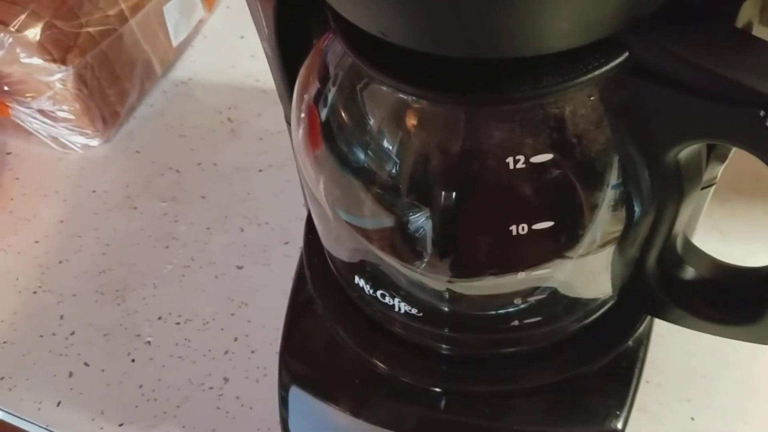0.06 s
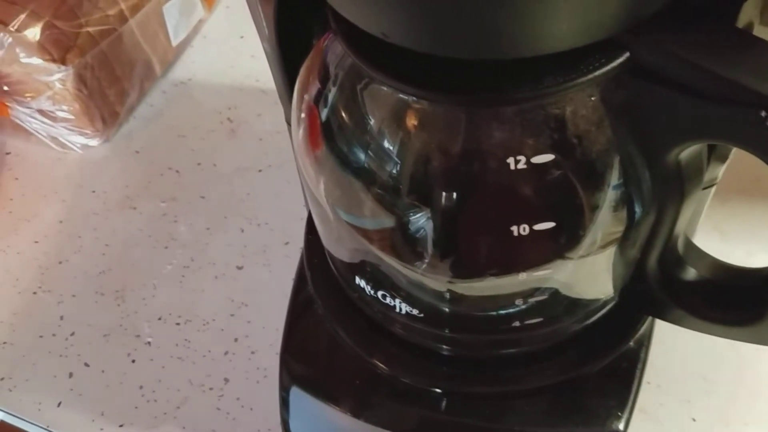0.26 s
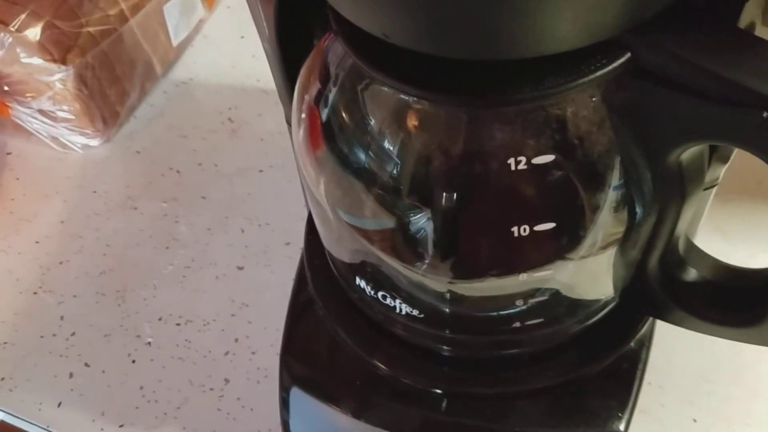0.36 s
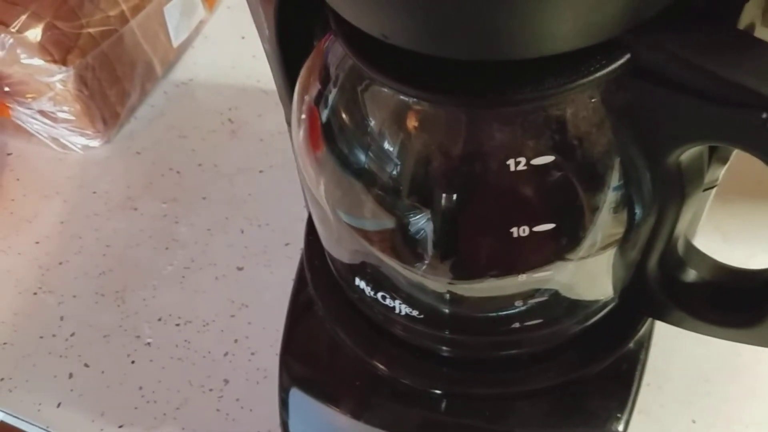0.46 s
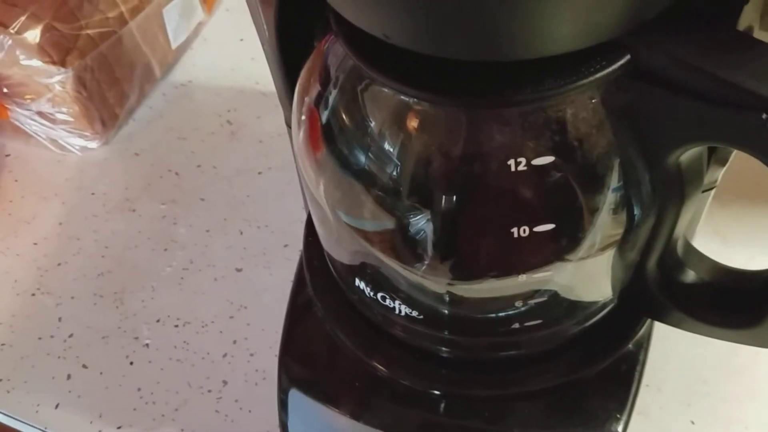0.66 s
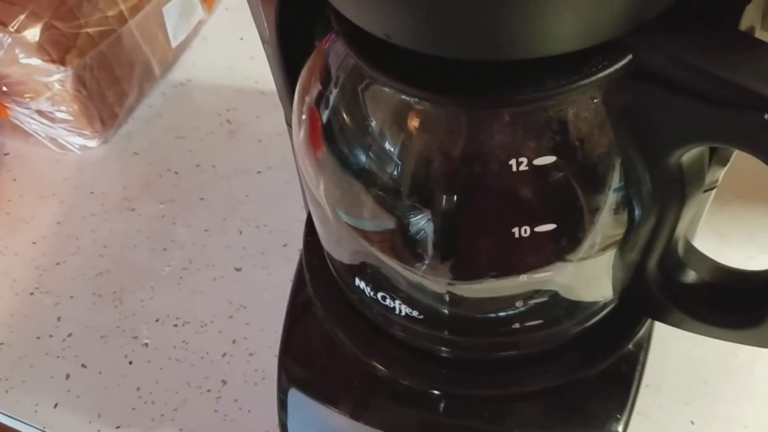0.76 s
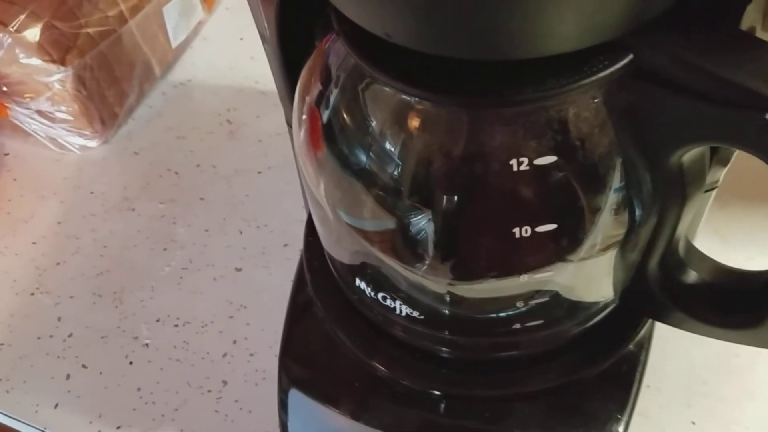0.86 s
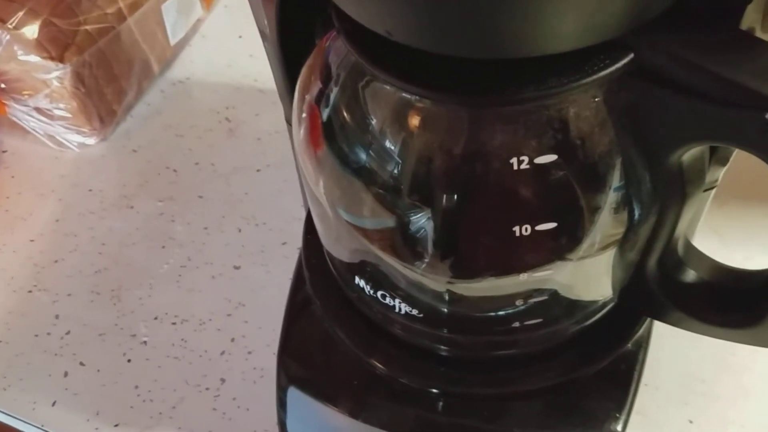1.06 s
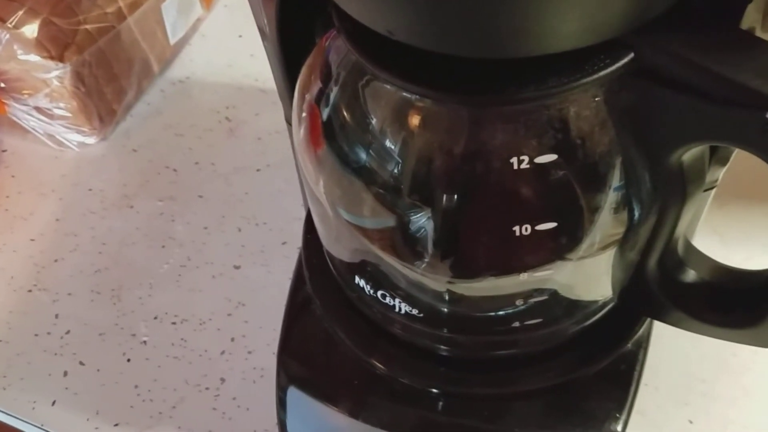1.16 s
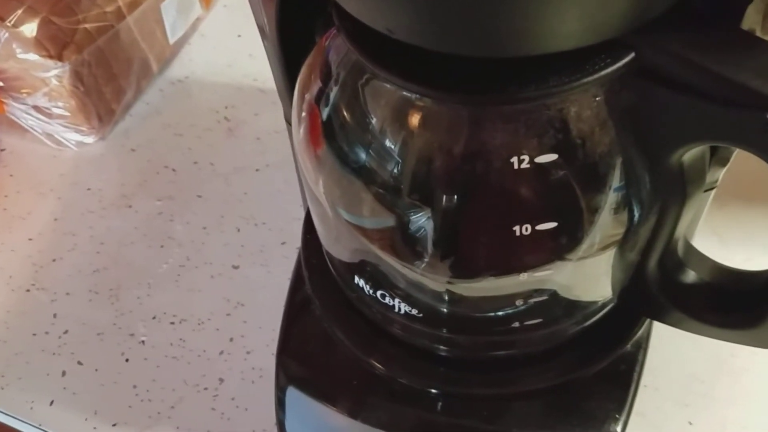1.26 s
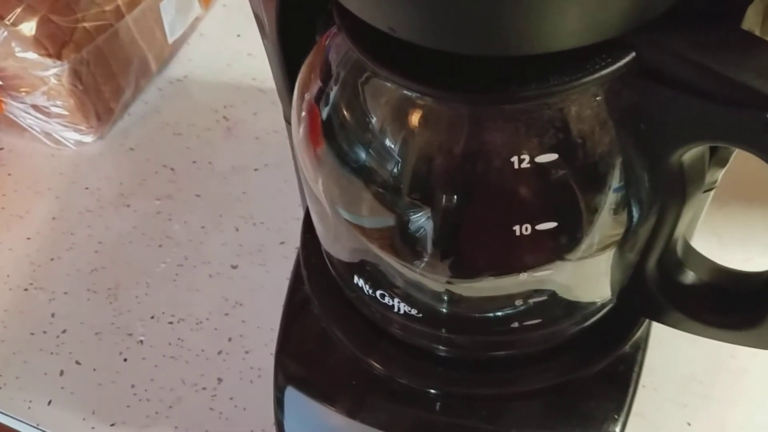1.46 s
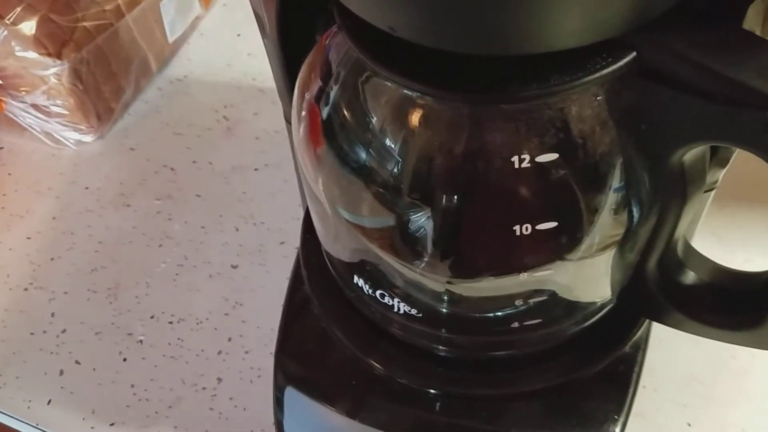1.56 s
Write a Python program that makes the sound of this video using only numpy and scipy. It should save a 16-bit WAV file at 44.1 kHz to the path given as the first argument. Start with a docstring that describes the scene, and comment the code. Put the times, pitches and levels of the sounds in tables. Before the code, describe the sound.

A drip coffee maker gurgles close by on a kitchen counter, with irregular wet bubbling and low gulps. One bubble pops sharply near the middle, then small spits of steam tick over a faint room rumble.

```python
"""On a kitchen counter, a drip coffee maker gurgles. Steam bubbles burst inside it, and each one
makes the plastic housing ring and throws a short wet splash. Larger air pockets gulp in the water
tube, one bubble pops sharply, and small spits of steam and droplets tick. The counter and walls
bounce these sounds back over the quiet rumble, hiss and hum of the room."""
import sys
import numpy as np
from scipy import signal
from scipy.fft import rfft, irfft
from scipy.io import wavfile

SR = 44100
rng = np.random.default_rng(int(sys.argv[2]) if len(sys.argv) > 2 else 0)


def wav_record(signal):
    """Record a signal, one row per channel, as 16-bit PCM in the file named by sys.argv[1]."""
    frames = np.transpose(np.atleast_2d(signal))
    bounded = np.clip(frames, -1, 1)
    # unit amplitude maps onto the largest positive 16-bit level
    quanta = np.round(bounded * 32767).astype(np.int16)
    wavfile.write(sys.argv[1], SR, quanta)


N = 70560
T = np.arange(N) / SR

# Bubbles bursting in the housing. Each row: start in seconds, then bass, middle, treble, top in dB.
BURSTS = [(0.159, -51, -49.5, -51.5, -62), (0.201, -56, -48, -52, -77), (0.2136, -51.5, -42.5, -45.5, -66),
          (0.268, -70, -49.5, -52, -63), (0.2995, -50, -42, -39.5, -61), (0.397, -53, -42.5, -41.5, -59),
          (0.45, -44.5, -51, -53, -61.5), (0.4855, -51, -48, -42.5, -75), (0.549, -62, -46, -64, -68),
          (0.594, -37, -39.5, -41, -66), (0.701, -45.5, -43, -41.5, -76), (0.775, -55, -80, -57.5, -56.5),
          (0.826, -55, -49, -42, -65), (0.834, -53, -45, -53, -60.5), (0.864, -51, -56, -50.5, -73),
          (0.881, -53, -50.5, -53.5, -75), (0.926, -71, -46.5, -53, -85), (1.03, -65, -44, -48, -66),
          (1.04, -63, -50, -54, -71), (1.081, -48.5, -51.5, -56.5, -66), (1.122, -49, -48.5, -52, -71),
          (1.187, -66, -50, -54, -63.5), (1.239, -58, -46, -44.5, -97), (1.251, -49.5, -54, -55.5, -66),
          (1.313, -53, -53.5, -40, -66), (1.347, -63, -44, -43.5, -66.5), (1.424, -91, -52, -55.5, -68),
          (1.454, -67, -56, -59.5, -69), (1.479, -59.5, -51.5, -53.5, -76), (1.538, -60, -53, -57, -72)]
BURST_BANDS_HZ = (280, 800, 2200, 5200)  # bass, middle, treble, top
SPLUTTER_GAP_S, SPLUTTER_LOSS_DB = .0045, 6.5
# Small bubbles between the bursts. Four base levels in dB: bass, middle, treble, top.
SIMMER_COLOUR = (-67.5, -62, -64, -71.5)
# How hard they simmer. Each row: time in seconds, dB added to the base levels.
SIMMER_STRENGTH = [(0, -3), (.13, -1.5), (.2, -8), (.45, 9), (.55, 1), (.7, 9), (.88, 4.5), (1.0, 1.5),
                   (1.15, 4.5), (1.35, -6), (1.6, -27)]
SIMMER_PER_S, SIMMER_SPREAD_DB = 70, 2.5
# The housing's own tones. Each row: pitch in Hz, relative level in dB, fade time in seconds,
# left minus right in dB, left's lead in radians. A fade time (t60) is how long a 60 dB drop takes.
HOUSING_TONES = [(191, -8, 0.098, -2, 0), (288.5, -4, 0.13, 0, -0.5), (466, 1, 0.063, -2, -0.5),
                 (515, -2.5, 0.12, -6, -1), (793, -10.5, 0.097, 0, -0.4), (873.3, -0.5, 0.061, -1.5, -0.8),
                 (975, 0, 0.085, -3.5, 0.77), (1245, -6.5, 0.078, -5.5, 3.06), (1506, -3, 0.035, -5.5, .8),
                 (1936, -4, 0.028, -16.5, -0.7), (2309, 0, 0.044, 3.5, 0), (2405, -4.5, .05, 5, 2.2),
                 (2588, -1.5, 0.038, 3.5, -1.3), (2940, -3.5, 0.037, 18.5, 0.8),
                 (3260, 0.5, 0.048, -6, 1.55), (3387, 1.5, 0.016, 17, -2.5), (4140, -4.5, 0.053, 1, -9.5)]
RING_DB, RING_SCATTER_DB, RING_RISE_S = -0.5, 1.5, 0.0008
# A burst's wet splash. Each row: frequency in Hz, relative level in dB.
SPLASH_COLOUR = [(150, -10), (350, -3), (650, -4.5), (950, -3.5), (1250, -7.5), (2400, -0.5), (3300, -4),
                 (4200, -8), (6000, -2.5), (8000, -14.5), (15000, -10.5)]
SPLASH_DB, SPLASH_RISE_S, SPLASH_T60_S = -.5, 0.0004, 0.061
# How alike both ears hear splashes, crack and spits. Each row: frequency in Hz, likeness from 0 to 1.
WET_LIKENESS = [(300, 0.99), (800, 1), (1300, 0.17), (2500, 0.18), (3500, 0.033), (12000, 0.033)]
# Air pockets. Each row: start in seconds, pitch in Hz, level in dB, fade time in seconds.
GULPS = [(.001, 484, -45.5, 0.067), (.002, 228, -46.5, 0.11), (.125, 270, -46.5, 0.055),
         (.162, 472, -44, 0.054), (.2015, 880, -37.5, .04), (.2135, 965, -33, 0.067),
         (.2995, 997, -35, 0.057), (.301, 830, -44, 0.058), (.405, 850, -40, 0.063), (.408, 283, -33, 0.12),
         (.461, 280, -37.5, 0.051), (.4855, 925, -32, 0.032), (0.5947, 537, -37, 0.081),
         (.592, 135, -38, 0.049), (.703, 550, -52, 0.049), (.868, 496, -40.5, .12),
         (.881, 610, -37.5, 0.03), (.893, 296, -40.5, 0.19), (1.04, 203, -40.5, 0.1),
         (1.042, 308, -36, 0.087), (1.083, 1260, -40.5, 0.027), (1.15, 280, -42.5, .12),
         (1.362, 300, -36.5, 0.077), (1.49, 315, -43.5, .12), (1.548, 314, -42, 0.096)]
GULP_RISE_S, GULP_GLIDE_PER_S = 0.00091, 0.13
# The pop's crack. Each row: frequency in Hz, level in dB.
CRACK_COLOUR = [(120, -40.5), (350, -33), (600, -33), (950, -31.5), (1700, -25), (2600, -21.5), (4200, -36),
                (5500, -26), (7500, -41.5), (10000, -42.5), (15000, -38.5)]
# How the crack dies away. Each row: frequency in Hz, fade time in seconds.
CRACK_FADE = [(200, 0.065), (900, 0.054), (2500, 0.034), (6000, 0.04), (14000, 0.043)]
# The pop's ringing. Each row: pitch in Hz, relative level in dB, fade time in seconds.
POP_TONES = [(306.5, -34.5, 0.28), (394, -31, 0.14), (443.4, -31.5, 0.16), (895, -21, 0.065),
             (1123, -28, 0.024), (1242, -38.5, 0.22), (1624, -18.5, 0.025), (1824, -25.5, 0.051),
             (2057, -37.5, 0.12), (2413, -29, 0.11), (2780, -27, 0.034), (3490, -34, 0.059),
             (5000, -36.5, 0.022), (5850, -30, 0.019)]
POP_START_S, SNAP_RISE_S = .6393, 0.00058  # the crack and the spits share this rise
# Spits of steam and droplets. Each row: start in seconds, pitch in Hz, level in dB.
SPITS = [(.028, 5800, -57), (.056, 5300, -59), (0.157, 3900, -55), (.196, 5000, -55.5), (0.238, 2760, -50),
         (.269, 3090, -46), (0.299, 4200, -52.5), (.366, 2920, -50), (.389, 2290, -43.5),
         (.428, 12800, -52.5), (0.449, 2820, -45.5), (0.548, 2620, -44), (0.548, 3970, -49),
         (.587, 2270, -38), (.695, 2330, -38), (0.778, 2730, -48), (0.781, 3100, -43.5), (0.958, 2400, -48),
         (1.053, 12500, -58.5), (1.123, 10800, -63), (1.207, 12500, -50.5), (1.208, 5550, -55.5),
         (1.226, 4600, -54), (1.228, 6000, -55), (1.2765, 12200, -57), (1.291, 4400, -46),
         (1.293, 5530, -50.5), (1.292, 7500, -60), (1.293, 3390, -42), (1.31, 2350, -32),
         (1.312, 3160, -45)]
SPIT_T60_S, SPIT_BAND_RATIO = 0.023, 1.094
# Echoes from the counter, then the walls. Each row: level in dB before the treble is cut,
# delay in seconds (also the rise time), fade time in seconds, treble cut in Hz.
ECHOES = [(-13.5, 0.0017, 0.12, 14000), (-17.5, 0.0074, 0.17, 3700)]
# The room's steady noise. Each row: frequency in Hz, relative level in dB for a band 1 Hz wide.
ROOM_COLOUR = [(25, -8), (40, -14), (56, -1), (79, -2), (112, -3.5), (158, -5.5), (223, -2.5), (316, -4.5),
               (447, -5.5), (630, -13.5), (900, -20.5), (1260, -19), (2400, -22), (3600, -29), (7100, -38),
               (10000, -41.5), (14500, -31.5)]
# How alike both ears hear that noise. Each row: frequency in Hz, likeness from 0 to 1.
ROOM_LIKENESS = [(60, 0.72), (400, 0.94), (1000, 0.23), (3000, 0.17), (12000, 0.033)]
# The room's faint drone. Each row: pitch in Hz, level in dB.
HUM_TONES = [(57, -70.5), (99.5, -65.5)]
ROOM_NOISE_DB, HUM_WIDTH_HZ = -54, 11.6
# How the two microphone openings differ. Each row: frequency in Hz, left minus right in dB.
MIC_BALANCE = [(100, -2), (300, -2.5), (600, -1), (1000, 0), (1800, 0), (2300, 2), (3500, 3), (5000, -0.5),
               (8000, -0.5), (14000, -1.5)]
CUTOFF_HZ = 15900


def bubbling():
    """Every steam bubble, big or small, rings the housing and throws a splash."""
    bubbles = np.vstack([splutter(np.array(BURSTS)), simmer()])
    scatter = rng.standard_normal((len(bubbles), len(HOUSING_TONES), 2))  # each tone's level and sign
    heard = bubbles[:, 0] < N / SR
    return housing_ring(bubbles[heard], scatter[heard]) + splashes(bubbles[heard])


def splutter(bursts):
    """Each burst is quickly followed by two weaker ones."""
    gaps = SPLUTTER_GAP_S * (.5 + rng.random((len(bursts), 2)))
    starts, levels = bursts[:, 0], bursts[:, 1:]
    return np.vstack([np.column_stack([starts + gaps[:, :k].sum(1), levels - k * SPLUTTER_LOSS_DB])
                      for k in range(3)])


def simmer():
    """Small bubbles burst at random moments; their rows look like those of BURSTS."""
    gap_dice, level_dice = rng.random((400, 2)).T
    starts = np.cumsum(.5 + gap_dice) / SIMMER_PER_S
    db = np.interp(starts, *np.transpose(SIMMER_STRENGTH)) + SIMMER_SPREAD_DB * (2 * level_dice - 1)
    return np.column_stack([starts, db[:, None] + np.array(SIMMER_COLOUR)])


def housing_ring(bubbles, scatter):
    """Each bubble makes the plastic ring with all its tones, in a slightly new mix."""
    out = np.zeros((2, N))
    for k, (hz, db, t60, pan_db, lead) in enumerate(HOUSING_TONES):
        gains = from_db(RING_DB + db + bubble_db(bubbles, hz) + RING_SCATTER_DB * scatter[:, k, 0])
        hits = clicks(bubbles[:, 0], gains * np.sign(scatter[:, k, 1]))
        # Taking away a very short ring softens the start.
        tone = ring(hits, hz, t60) - ring(hits, hz, RING_RISE_S * np.log(1000))
        lean = from_db(pan_db / 2) * np.exp(.5j * lead)
        out += np.imag(tone * np.array([[lean], [1 / lean]]))
    return out


def splashes(bubbles):
    """Each bubble throws a wet splash: a puff of noise that rises fast and fades."""
    fade = from_db(-60 / (SPLASH_T60_S * SR)) ** 2
    rise = np.exp(-1 / (SPLASH_RISE_S * SR))
    out = np.zeros((2, N))
    for low, hz, high in bands(count=14):
        gains = from_db(SPLASH_DB + at_hz(SPLASH_COLOUR, hz) + bubble_db(bubbles, hz))
        fading = signal.lfilter([1], [1, -fade], clicks(bubbles[:, 0], gains ** 2))
        power = signal.lfilter([1 - rise], [1, -rise], fading)
        out += np.sqrt(power) * band_noise(low, high, at_hz(WET_LIKENESS, hz))
    return out


def gulps():
    """Each air pocket rings as it breaks free, and its pitch rises a little."""
    out = np.zeros(N)
    for start, hz, db, t60 in GULPS:
        age = T - start
        cycles = hz * age * (1 + GULP_GLIDE_PER_S * age / 2)
        out += from_db(db) * swell(start, GULP_RISE_S, t60) * np.sin(2 * np.pi * cycles)
    return out


def pop():
    """One bubble pops with a sharp crack of noise and leaves tones ringing."""
    out = np.zeros((2, N))
    for low, hz, high in bands(count=14):
        shape = swell(POP_START_S, SNAP_RISE_S, at_hz(CRACK_FADE, hz))
        out += from_db(at_hz(CRACK_COLOUR, hz)) * shape * band_noise(low, high, at_hz(WET_LIKENESS, hz))
    hit = clicks([POP_START_S], gains=0.73)
    for k, (hz, db, t60) in enumerate(POP_TONES):
        out += (-1) ** k * from_db(db) * ring(hit, hz, t60).imag  # every other tone starts downward
    return out


def spits():
    """Steam and droplets spit: each is a bright tick of noise around one pitch."""
    out = np.zeros((2, N))
    for start, hz, db in SPITS:
        noise = band_noise(hz / SPIT_BAND_RATIO, hz * SPIT_BAND_RATIO, at_hz(WET_LIKENESS, hz))
        out += from_db(db) * swell(start, SNAP_RISE_S, SPIT_T60_S) * noise
    return out


def kitchen_echo(sound):
    """The counter sends back a short bright echo, the walls a longer dull one, different at each ear."""
    echo = 0
    for db, rise, t60, cut_hz in ECHOES:
        tail = rng.standard_normal((2, N)) * swell(rise, rise, t60)
        tail /= np.sqrt(np.sum(tail[0] ** 2))
        treble_cut = signal.butter(1, cut_hz, fs=SR, output="sos")
        echo = echo + from_db(db) * signal.sosfilt(treble_cut, tail)
    return signal.fftconvolve(sound, echo, axes=1)[:, :N]


def room_noise():
    """The room has a steady low rumble and a faint hiss."""
    noise = np.zeros((2, N))
    for low, hz, high in bands(count=19):
        gain = from_db(at_hz(ROOM_COLOUR, hz)) * np.sqrt(high - low)
        noise += gain * band_noise(low, high, at_hz(ROOM_LIKENESS, hz))
    return from_db(ROOM_NOISE_DB) * unit_level(noise)


def room_hum():
    """Low tones waver in the room, made here by letting noise ring at each pitch."""
    t60 = np.log(1000) / (np.pi * HUM_WIDTH_HZ)
    out = np.zeros(N)
    for hz, db in HUM_TONES:
        tone = ring(rng.standard_normal(2 * N), hz, t60).imag[N:]  # skip the build-up
        out += from_db(db) * unit_level(tone)
    return out


def from_db(db):
    """Turn decibels into a number to multiply by."""
    return 10 ** (np.asarray(db) / 20)


def unit_level(x):
    """Scale a sound so its average level (rms) is 1."""
    return x / np.sqrt(np.mean(x ** 2) + 1e-20)


def at_hz(table, hz):
    """Read between a table's rows, with octaves evenly spaced."""
    frequencies, values = np.transpose(table)
    return np.interp(np.log(hz), np.log(frequencies), values)


def bubble_db(bubbles, hz):
    """Each bubble's level at one frequency."""
    return np.array([np.interp(np.log(hz), np.log(BURST_BANDS_HZ), row[1:]) for row in bubbles])


def clicks(starts, gains):
    """One click at each start time."""
    out = np.zeros(N)
    np.add.at(out, np.clip((np.asarray(starts) * SR).astype(int), 0, N - 1), gains)
    return out + 1e-18


def ring(x, hz, t60):
    """Each click in x starts a fading tone; the result's imaginary part is the sine wave."""
    return signal.lfilter([1], [1, -from_db(-60 / (t60 * SR)) * np.exp(2j * np.pi * hz / SR)], x)


def swell(start, rise, t60):
    """A loudness shape that rises quickly, then dies away."""
    age = np.maximum(T - start, 0)
    return (1 - np.exp(-age / rise)) * from_db(-60 * age / t60)


def bands(count):
    """Half-octave bands ending at 17000 Hz, each as its low edge, centre and high edge."""
    edges = 17000 / 2 ** (np.arange(count, -1, -1) / 2)
    return zip(edges, np.sqrt(edges[1:] * edges[:-1]), edges[1:])


def band_noise(low, high, likeness):
    """Stereo noise in one band; a likeness of 1 gives both ears the same sound."""
    band = signal.butter(2, [low, high], "band", fs=SR, output="sos")
    shared, opposite = signal.sosfilt(band, rng.standard_normal((2, N)))
    return unit_level(np.sqrt(1 + likeness) * shared + np.sqrt(1 - likeness) * opposite * [[1], [-1]])


def scene():
    """The coffee maker, its echo and the room behind it."""
    machine = bubbling() + gulps() + pop() + spits()
    return machine + kitchen_echo(machine) + room_noise() + room_hum()


def record(dry):
    """Two microphone openings colour left and right differently; the highest treble is cut."""
    hz = np.maximum(np.fft.rfftfreq(2 * N, 1 / SR), 1)
    lean = from_db(at_hz(MIC_BALANCE, hz) / 2)
    coloured = irfft(rfft(dry, 2 * N) * np.array([lean, 1 / lean]))[:, :N]
    return signal.sosfilt(signal.ellip(10, .2, 70, CUTOFF_HZ, fs=SR, output="sos"), coloured)


dry = scene()
out = record(dry)
wav_record(out)
```